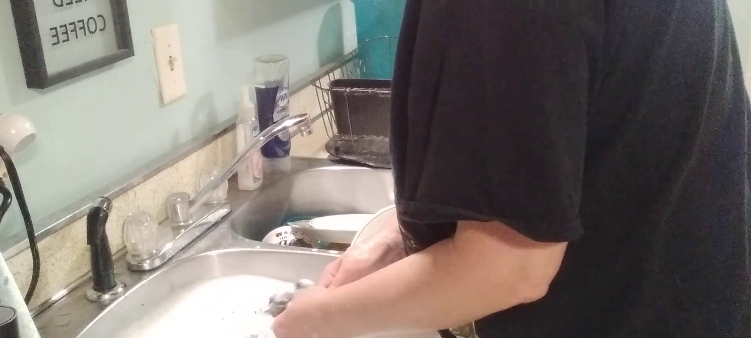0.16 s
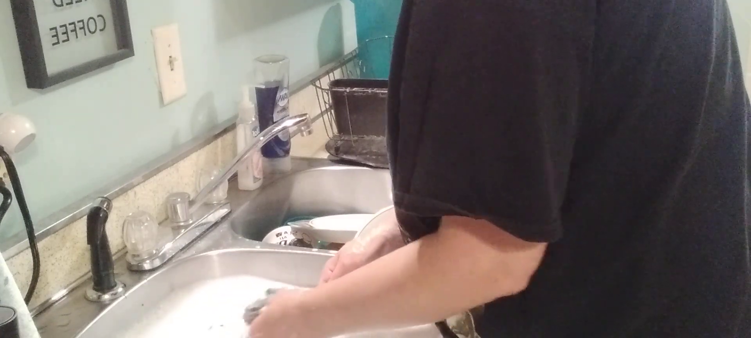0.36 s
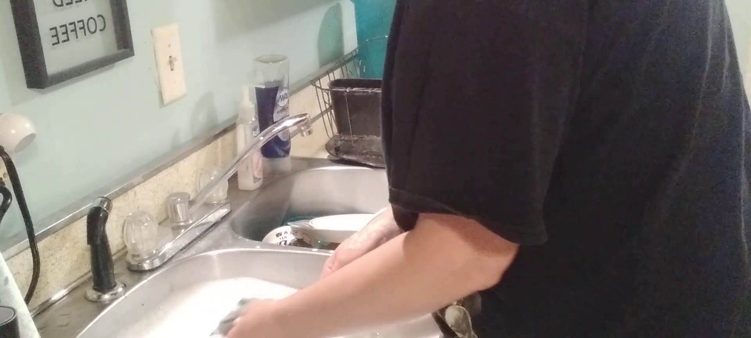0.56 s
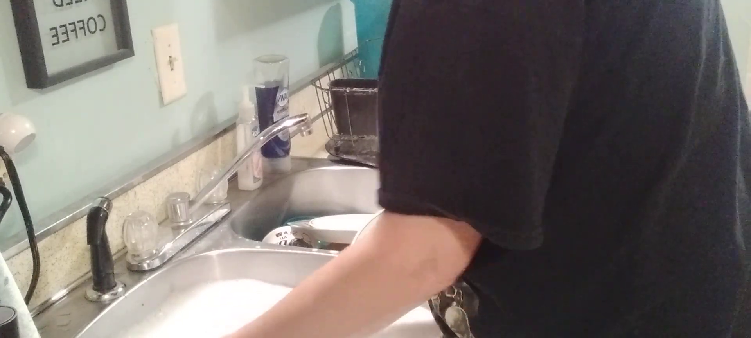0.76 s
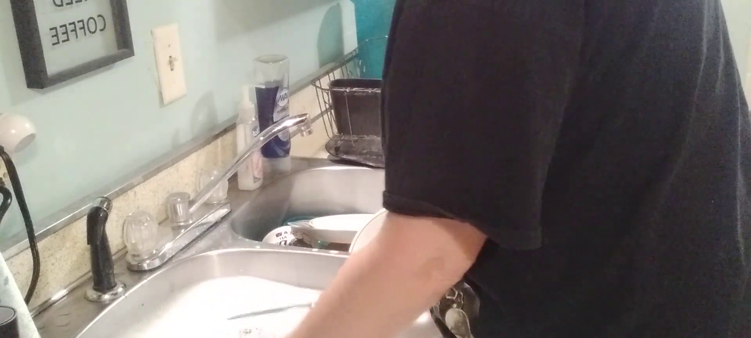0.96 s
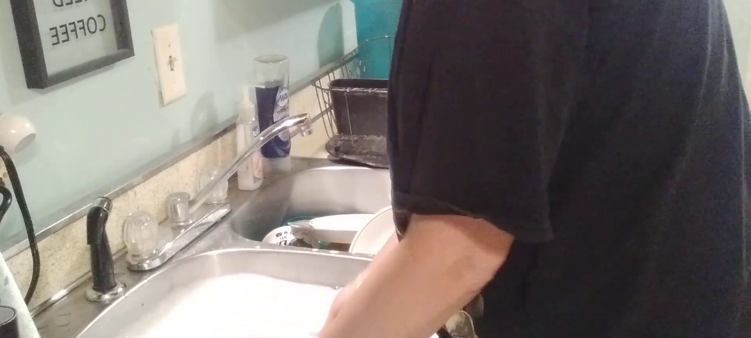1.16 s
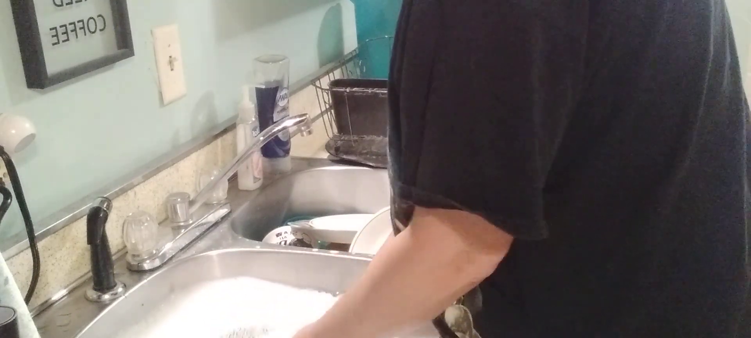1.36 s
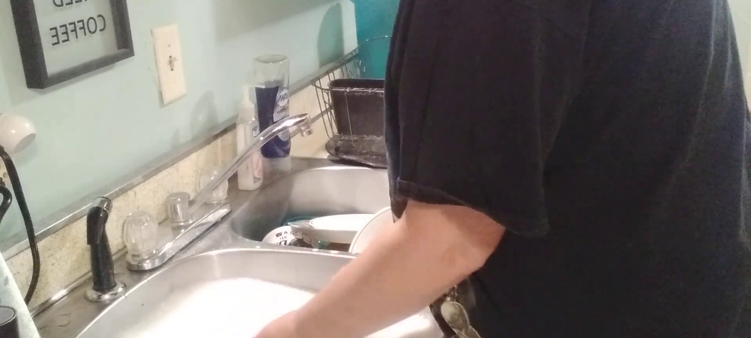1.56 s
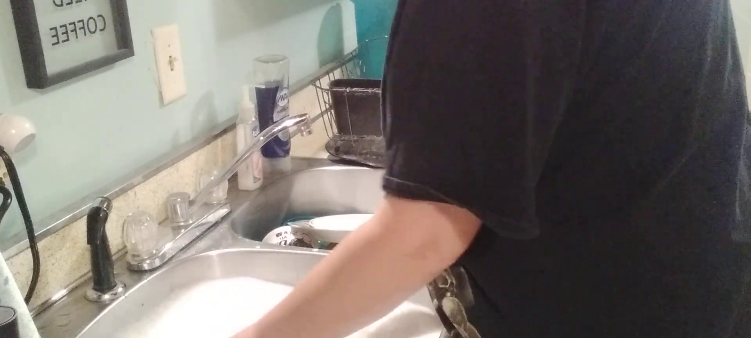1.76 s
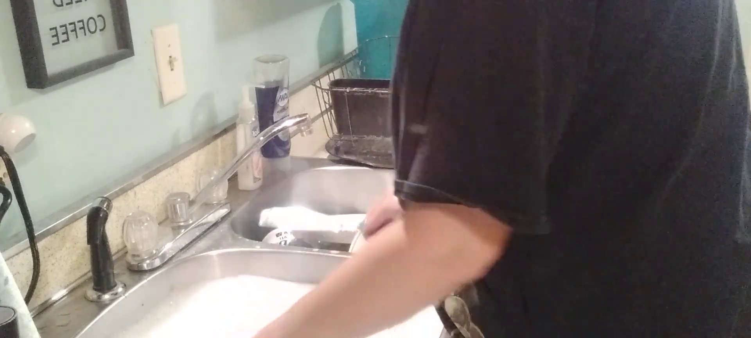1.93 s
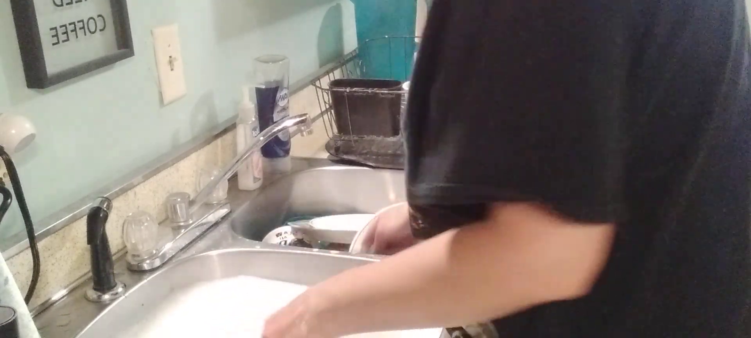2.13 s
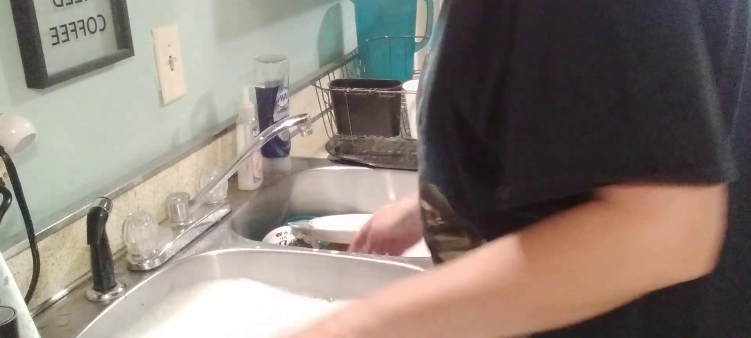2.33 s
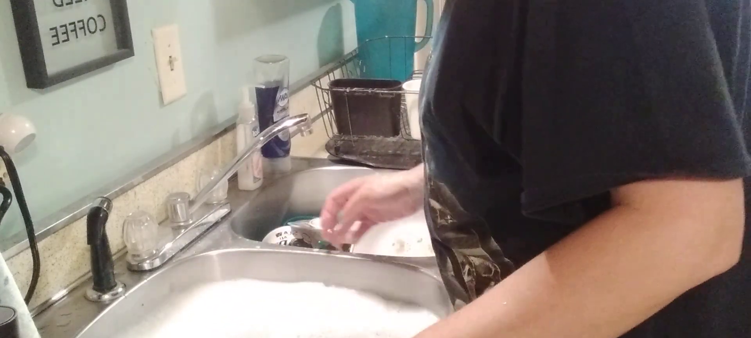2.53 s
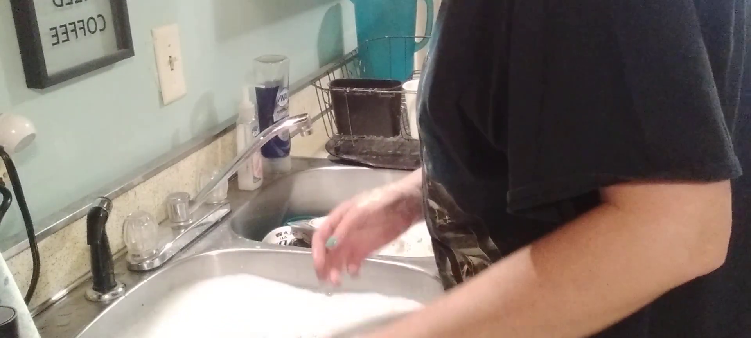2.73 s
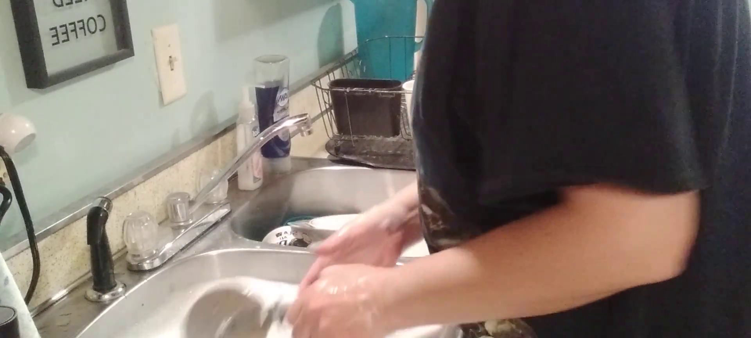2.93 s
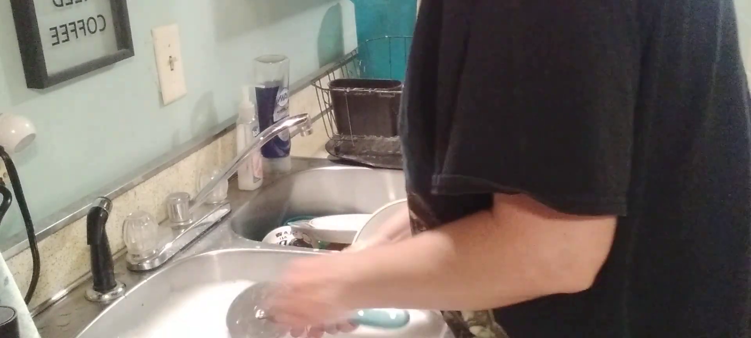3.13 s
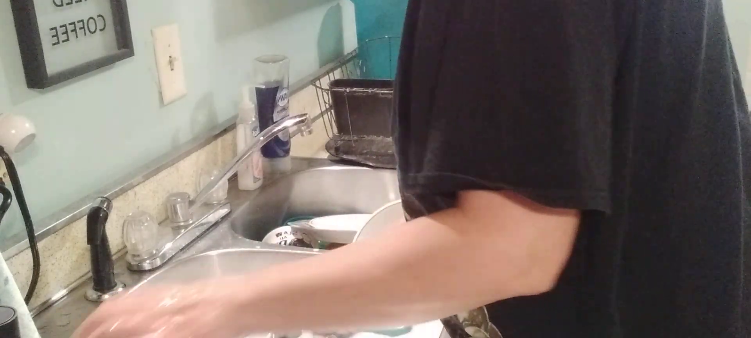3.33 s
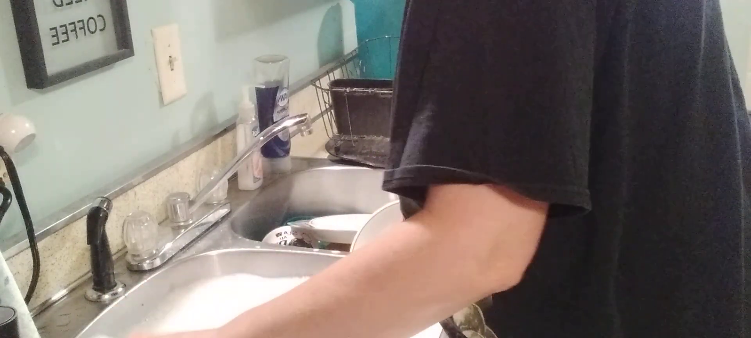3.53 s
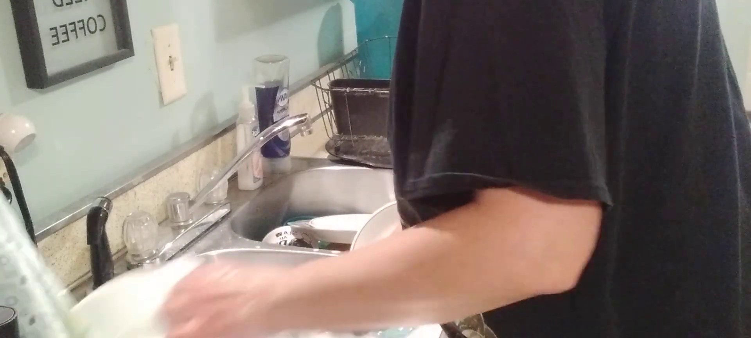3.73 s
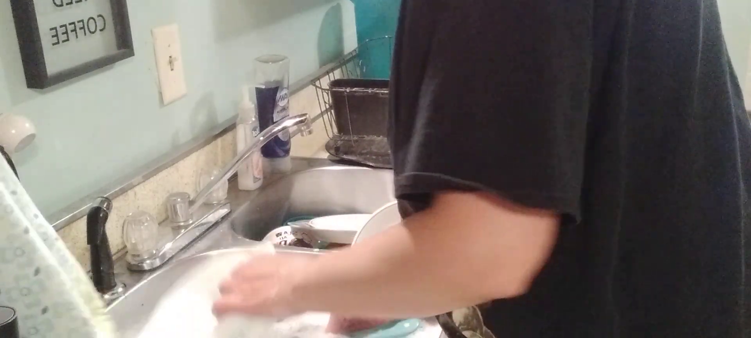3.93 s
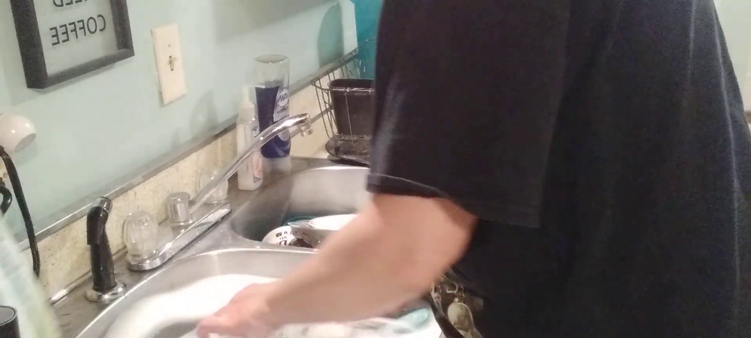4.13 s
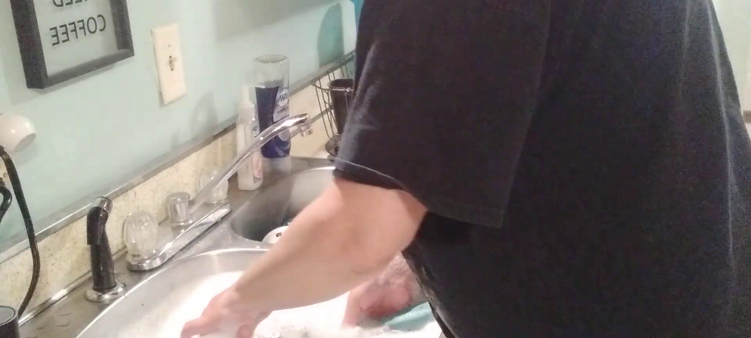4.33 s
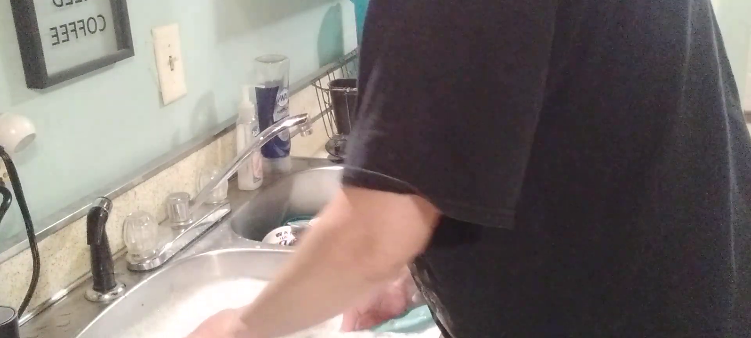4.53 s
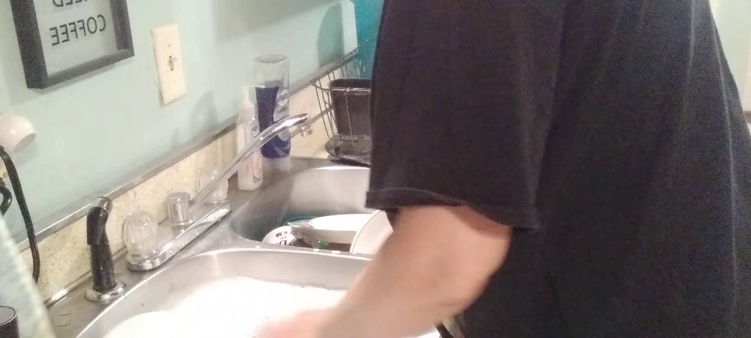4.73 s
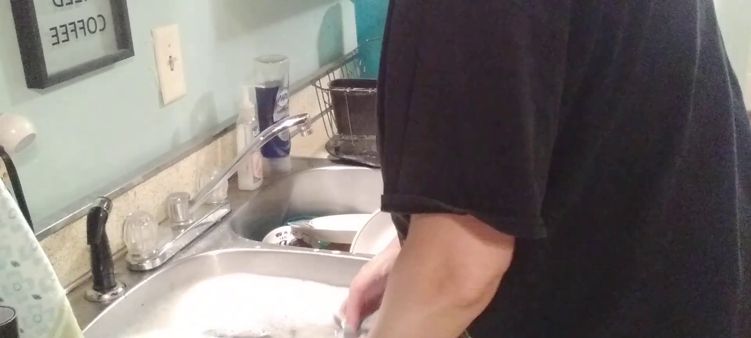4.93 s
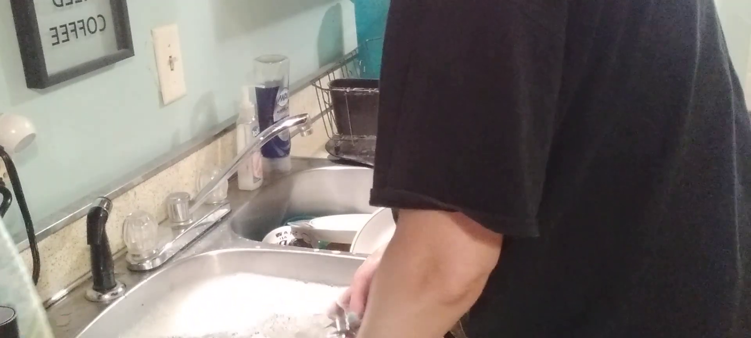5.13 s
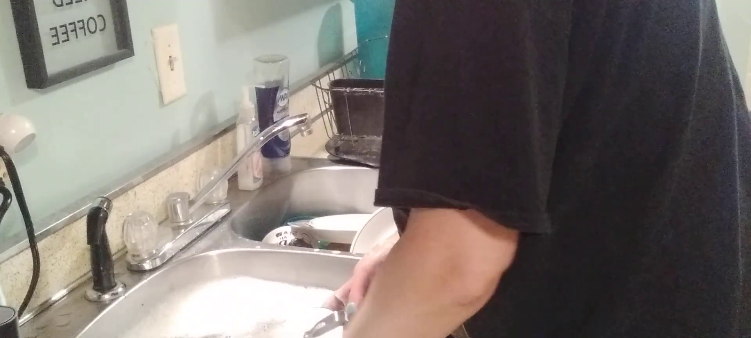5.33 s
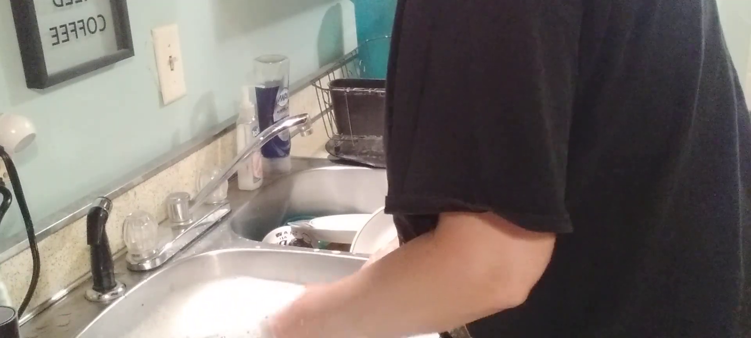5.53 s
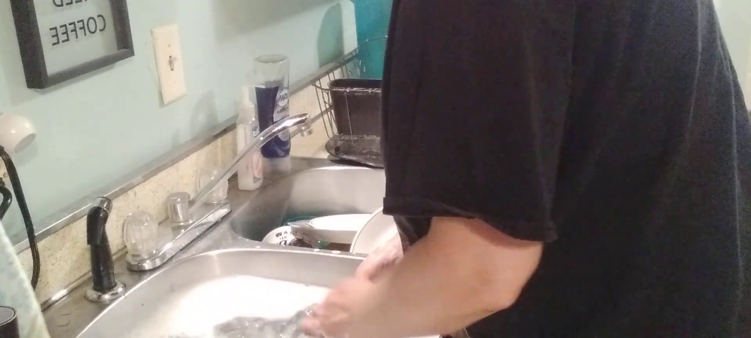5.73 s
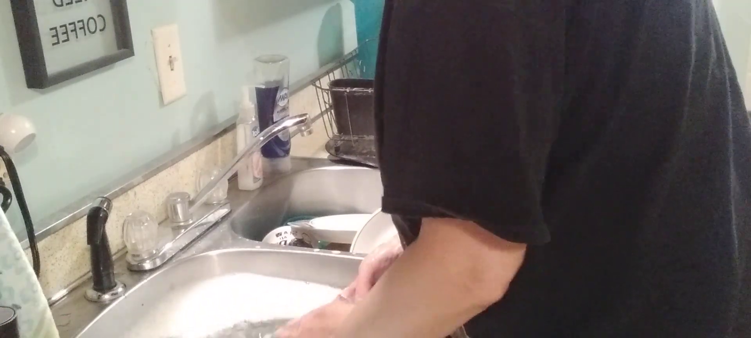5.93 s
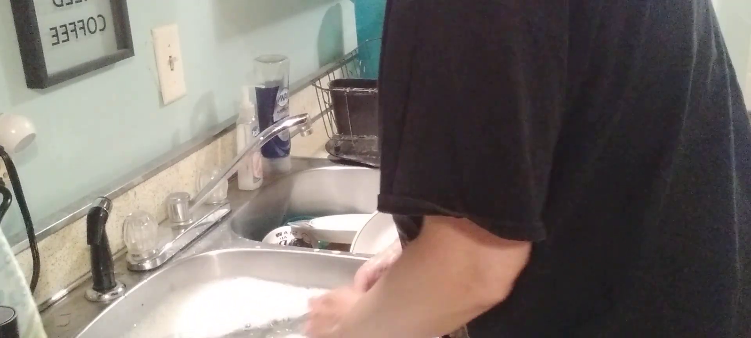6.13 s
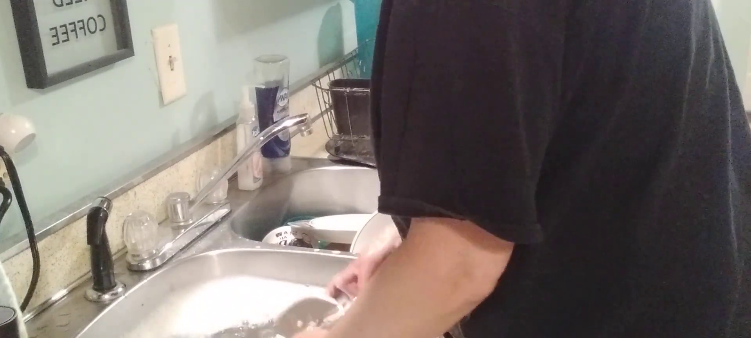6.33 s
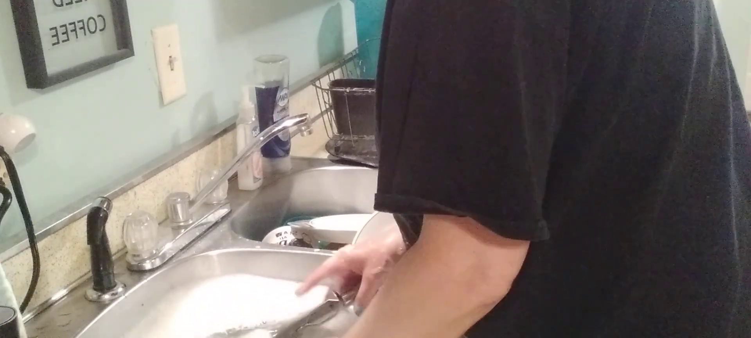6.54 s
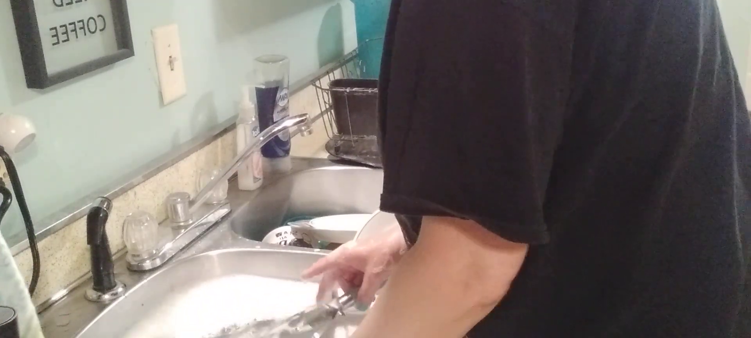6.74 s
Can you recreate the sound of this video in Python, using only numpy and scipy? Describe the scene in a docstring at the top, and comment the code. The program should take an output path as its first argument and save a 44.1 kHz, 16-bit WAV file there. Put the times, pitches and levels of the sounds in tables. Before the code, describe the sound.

Soft dishwater sounds, a bright clattering dump of forks, knives and spoons into a steel sink, then plops, muffled bumps and one sharp dish clink.

```python
"""Two handfuls of cutlery crash into the empty half of a double steel sink in a small kitchen.
The pieces, basin floor and fork tines ring as decaying modes and noise. In the filled half, dishes knock,
clink and tick as damped blows, and a dipped bowl sags in pitch. Drips, squishing suds and gurgles are
ringing bubbles over soft hiss. Hard walls echo it all, over a faint mains hum and still room air."""
import sys
import numpy as np
from scipy import signal
from scipy.fft import rfft, irfft
from scipy.io import wavfile
from scipy.ndimage import uniform_filter1d, minimum_filter1d

SR = 44100
rng = np.random.default_rng(int(sys.argv[2]) if len(sys.argv) > 2 else 0)


def pcm_store(signal):
    """Save signal as 16-bit PCM."""
    levels = np.round(np.clip(np.atleast_2d(signal), -1, 1) * 32767)
    wavfile.write(sys.argv[1], SR, levels.astype(np.int16).T)


N = 299423
TIME = np.arange(N) / SR   # s
AGE = np.arange(SR) / SR   # s since a blow

# Ringing modes of the pieces of cutlery, which the landings name. Each row: pitch in Hz, level in dB.
SPOON = [(1782, -33.5), (2159, -27), (3560, -32), (4221, -27), (4960, -33.5), (5356, -30.5), (7031, -33.5),
         (7440, -27.5)]
KNIFE = [(1803, -37), (1949, -33.5), (2045, -35), (2159, -35.5), (3973, -42.5), (5150, -37.5),
         (5340, -36.5), (7440, -38.5), (9819, -36), (10713, -44.5), (11181, -43.5)]
FORK = [(2466, -43.5), (2649, -47), (3693, -41.5), (4231, -42), (6230, -40.5), (7450, -42.5), (7957, -41.5),
        (8690, -43.5), (11208, -48.5)]
TEASPOON = [(1798, -11.5), (4860, -0.5), (5507, -4), (6137, -2), (6395, -7), (7477, -4.5)]


def from_db(db):
    """Amplitude ratio of a level in dB."""
    return 10 ** (np.asarray(db) / 20)


def rms_one(x):
    """Scale a sound to rms 1."""
    return x / np.sqrt(np.mean(x ** 2) + 1e-20)


def attack_one(x):
    """Scale a blow so that its first 25 ms have rms 1."""
    return x / np.sqrt(np.mean(x[:SR // 40] ** 2) + 1e-20)


def fade(t60, age=AGE):
    """Exponential decay by 60 dB in t60 seconds."""
    return from_db(-60 * age / max(t60, 1e-3))


def onset(onset_s):
    """Exponential rise of a blow, with its time constant in seconds."""
    return 1 - np.exp(-AGE / onset_s)


def add(track, s, sound):
    """Lay a sound into a track at s seconds."""
    start = round(s * SR)
    track[start:start + len(sound)] += sound[:len(track) - start]


def at_hz(points, hz):
    """Read a curve over log frequency."""
    curve_hz, values = np.array(points).T
    return np.interp(np.log(hz + 1e-9), np.log(curve_hz), values)


def cut(x, hz, kind, order=2):
    """Butterworth filter."""
    sos = signal.butter(order, np.clip(hz, 10, .45 * SR), kind, fs=SR, output="sos")
    return signal.sosfilt(sos, x + 1e-18)


def convolve(x, response):
    """Pass a sound through an impulse response, keeping its length."""
    return signal.fftconvolve(x, response)[:len(x)]


def body(colour, peaks=()):
    """Causal (minimum-phase) impulse response of a broad colour with resonances on top."""
    size = 8192
    hz = np.arange(size // 2 + 1) * SR / size
    db = at_hz(colour, hz)
    for centre, width, peak_db in peaks:
        db = db + peak_db / (1 + (2 * (hz - centre) / width) ** 2)
    cepstrum = irfft(np.log(from_db(db)))
    cepstrum[1:size // 2] *= 2   # fold it onto positive time
    return irfft(np.exp(rfft(cepstrum[:size // 2], size)))


def sheet(t60, crack_db):
    """Countless overlapping modes of a steel sheet: a sharp crack, then a noisy ring."""
    return rng.standard_normal(len(AGE)) * (fade(t60) + from_db(crack_db) * fade(0.015))


def bounces(chatter_s, per_s, size):
    """A first contact and a dying train of uneven rebounds."""
    hits = rng.random(len(AGE)) < per_s / SR
    train = hits * rng.normal(0, size, len(AGE)) * np.exp(-AGE / max(chatter_s, 1e-3))
    train[0] = 1
    return train


def ring(hz, t60):
    """One decaying mode, pushed either way at random."""
    return np.sin(2 * np.pi * hz * AGE) * fade(t60) * rng.choice([-1, 1])


def struck(contacts, modes, spread_db):
    """Every rebound meets another spot, so each mode (Hz, dB, t60 s) gets strengths of its own."""
    out, at = np.zeros(len(AGE)), np.flatnonzero(contacts)
    for hz, db, t60 in modes:
        drive = np.full(len(AGE), 1e-18)
        strengths = from_db(db + spread_db * rng.standard_normal(len(AGE) // 20)[:len(at)])
        drive[at] = contacts[at] * strengths * rng.choice([-1, 1])
        r, w = fade(t60, 1 / SR), 2 * np.pi * hz / SR   # two-pole resonator
        out += signal.lfilter([0, np.sin(w)], [1, -2 * r * np.cos(w), r * r], drive)
    return attack_one(out)


def bubble(hz, t60, rise, swell_cycles=1.04):
    """A ringing bubble rises in pitch as it nears the surface."""
    age = AGE[:int(np.clip(2 * t60, .002, .5) * SR)]
    phase = 2 * np.pi * np.cumsum(hz * (1 + rise * age / t60)) / SR
    return np.sin(phase) * fade(t60, age) * (1 - np.exp(-age * hz / swell_cycles))


def swarm(level_db, low_hz, high_hz, length_s, bubbles_per_s, cycles, hiss_db, swell):
    """One push of the water frees a swarm of tiny ringing bubbles over a soft hiss."""
    fizz, span = np.zeros(SR), np.clip(2 * length_s, .02, .4)
    for when, pitch in rng.random((int(bubbles_per_s * span) + 1, 2)):
        hz = low_hz * (high_hz / low_hz) ** pitch
        add(fizz, when * span, bubble(hz, cycles / hz, rise=.03))
    fizz = rms_one(fizz[:int(span * SR)])
    hiss = cut(rng.standard_normal(len(fizz)), low_hz, "high", order=8)
    hiss = rms_one(cut(hiss, high_hz, "low", order=8))
    progress = AGE[:len(fizz)] / max(length_s, 1e-3)
    squeeze = (1 - np.exp(-progress / swell)) * np.exp(-progress ** 2)
    return from_db(level_db) * (fizz + from_db(hiss_db) * hiss) * squeeze


def cutlery(ring_t60=0.19, basin_t60=0.21, modes_db=-8.0, basin_db=-3, crack_db=1, spread_db=2,
            jostle_db=-8, jostle_t60=.1, jostle_db_per_octave=-2, note_t60=0.1, onset_s=0.0011):
    """Each landing rings the piece, its neighbours in the handful and the basin floor."""
    # Cutlery landing in the empty basin. Each row: start in seconds, level in dB, chatter in seconds,
    # note of the spot of floor it hits in Hz, level of that note in dB against the blow, modes of the piece.
    landings = [(2.252, -33, .027, 720, -11.5, TEASPOON), (2.263, -9, .0052, 242, -13.5, SPOON),
                (2.324, -16.5, .0059, 742, -1.5, SPOON), (2.353, -18.5, .0073, 1254, -7, SPOON),
                (2.379, -7, .009, 1132, -9, KNIFE), (2.400, -11.5, .025, 642, -11, KNIFE),
                (2.445, -18, 0.018, 563, -9.5, KNIFE), (2.497, -15.5, 0.0028, 2635, -10.5, TEASPOON),
                (2.510, -17, .014, 1349, -5.5, TEASPOON), (2.606, -24, 0.017, 1100, -9.5, TEASPOON),
                (2.663, -34.5, 0.07, 680, -4.5, TEASPOON), (2.748, -20, .0041, 1148, -9, SPOON),
                (2.774, -22, 0.033, 682, -5.5, FORK), (2.825, -14.5, 0.026, 256, -9, FORK),
                (2.851, -16, .04, 665, -9, FORK), (2.913, -18.5, .0051, 693, -3.5, FORK),
                (2.997, -24.5, 0.0026, 722, -21, FORK)]
    # Broad colour of the empty basin. Each row: frequency in Hz, level in dB.
    steel_colour = [(30, -27.5), (120, -22.5), (190, -8), (900, -6), (2200, 1.5), (3200, -1), (5400, 2.5),
                    (7800, -5), (11000, -12.5), (16000, -19)]
    # Its strongest resonances. Each row: centre in Hz, width in Hz, height in dB.
    steel_peaks = [(240, 41, 5.5), (680, 310, 7.8), (1164.6, 130, 5.3), (1374, 45, 3.9), (2004, 130, 4.6)]
    firm_db = -14.5   # level of a firm landing; harder ones are brighter, softer ones boomier
    jostle_low_hz, jostle_high_hz = 1798, 12580   # range of the neighbours' modes
    out, steel = np.zeros(N), body(steel_colour, steel_peaks)
    for s, level_db, chatter_s, note_hz, note_db, modes in landings:
        force_db = level_db - firm_db
        boom_db = 6 - 0.12 * force_db - 2.5 * (modes == FORK)   # the light fork shakes the basin less
        treble_db = -6 + 0.47 * force_db + 5.5 * (modes == KNIFE)   # the thin blade is brighter
        contacts = bounces(chatter_s, per_s=380, size=.8)
        # high modes die sooner
        piece = [(hz, db, ring_t60 * (4000 / hz) ** 0.32) for hz, db in modes]
        blow = from_db(modes_db) * struck(contacts, piece, spread_db)
        neighbours = [(hz, jostle_db_per_octave * np.log2(hz / jostle_low_hz), jostle_t60)
                      for hz in rng.uniform(jostle_low_hz, jostle_high_hz, size=12)]
        blow += from_db(jostle_db) * struck(contacts, neighbours, spread_db)
        basin = convolve(contacts, convolve(sheet(basin_t60, crack_db), steel))
        blow += from_db(basin_db) * attack_one(basin)
        blow += (from_db(boom_db) - 1) * cut(blow, 1000, "low", order=1)
        blow += (from_db(treble_db) - 1) * cut(blow, 11000, "high", order=1)
        blow += from_db(note_db) * attack_one(ring(note_hz, note_t60))
        add(out, s, from_db(level_db) * blow * onset(onset_s))
    return out


def tines(struck_s=2.86, beat_hz=11, partner=0.29):
    """Neighbouring fork tines are slightly out of tune, so their ring wavers as it dies."""
    # Tines singing on in the second crash. Each row: pitch in Hz, level in dB, t60 in seconds.
    tine_modes = [(2730, -33, .68), (4377, -28.5, .5), (7700, -35, .62), (9830, -33, .48)]
    out = np.zeros(N)
    for hz, db, t60 in tine_modes:
        neighbour = ring(hz + beat_hz * (.5 + rng.random()), t60)
        add(out, struck_s, from_db(db) * (ring(hz, t60) + partner * neighbour))
    return out


def knocks(basin_t60=0.11, crack_db=2, thump_db=-3, thump_t60=0.081, cushion=4):
    """Dishes bump the filled basin; the deeper under water, the duller the knock and the softer its onset."""
    # Each row: start in seconds, level in dB, dull above this Hz, pitch of the dish's thump in Hz.
    bumps = [(3.582, -40, 900, 518), (3.603, -32, 1314, 215), (3.630, -31, 594, 198.5),
             (3.665, -31.5, 855, 487), (3.690, -37.5, 867, 609.5), (4.741, -33.5, 2686, 346),
             (4.874, -35.5, 1300, 352), (4.921, -36, 1500, 366), (4.961, -42.5, 1200, 363),
             (5.167, -36.5, 783, 696), (5.238, -40.5, 600, 591.6), (5.780, -39, 3500, 1126),
             (5.821, -43, 4060, 555), (5.978, -38.5, 3260, 379), (5.993, -37.5, 1870, 302),
             (6.491, -26, 4020, 975), (6.497, -30, 2184, 537), (6.599, -42.5, 1090, 740),
             (6.717, -47, 1800, 364)]
    # Broad colour of the filled basin. Each row: frequency in Hz, level in dB.
    filled_colour = [(40, -15), (200, 0), (700, 2.5), (1100, -3), (1600, -5.5), (2300, -2), (3500, -6),
                     (8000, -1), (15000, -9)]
    # Its resonances. Each row: centre in Hz, width in Hz, height in dB.
    filled_peaks = [(393, 20, 6), (606, 24, 3.8), (717, 21, 4.1), (1075, 210, 6.7), (2020, 1000, 2.1)]
    out, filled = np.zeros(N), body(filled_colour, filled_peaks)
    for s, level_db, dull_hz, thump_hz in bumps:
        chatter_s = 0.012 * (980 / dull_hz) ** 0.62   # duller knocks chatter for longer
        contacts = bounces(chatter_s, per_s=360, size=.6)
        blow = convolve(contacts, convolve(sheet(basin_t60, crack_db), filled))
        blow = cut(blow, dull_hz, "low", order=2)
        blow = attack_one(cut(blow, 0.61 * thump_hz, "high", order=3))
        blow += from_db(thump_db) * attack_one(ring(thump_hz, thump_t60))
        blow = cut(blow * onset(cushion / dull_hz), [0.5 * thump_hz, 4.6 * dull_hz], "band")
        add(out, s, from_db(level_db) * attack_one(blow))
    return out


def clink(crack_t60=0.025, low_hz=480, high_hz=6000, onset_s=0.00057):
    """A wet dish held in the hand above the water rings only briefly."""
    # Each row: start in seconds, level in dB, crack of the contact in dB against the modes' scale.
    contacts = [(5.7427, -13.5, -9.5), (5.779, -28, 10)]
    # Modes of the dish. Each row: pitch in Hz, level in dB, t60 in seconds.
    dish_modes = [(1070, -5.5, 0.026), (1755, -0.5, 0.021), (2050, -7, 0.024), (4450, -7.5, 0.018)]
    out = np.zeros(N)
    for s, level_db, crack_db in contacts:
        crack = cut(rng.standard_normal(len(AGE)) * fade(crack_t60), high_hz, "low")
        blow = sum(from_db(db) * ring(hz, t60) for hz, db, t60 in dish_modes)
        blow = (blow + from_db(crack_db) * crack) * onset(onset_s)
        add(out, s, from_db(level_db) * cut(blow, low_hz, "high", order=4))
    return out


def bowl(t60=0.2, rough=0.57, flutter_hz=70):
    """Water loads a dipped bowl: its ring sags, each mode by its own share, and flutters as water laps at it."""
    # Touches of the bowl. Each row: start in seconds, level in dB.
    touches = [(3.304, -42), (3.355, -51)]
    # Its modes. Each row: pitch in Hz, level in dB, share of the sag (exponent of the pitch ratio).
    bowl_modes = [(630, 1, 1.22), (1580, -2.5, 1.29), (2694, -5, 0.65)]
    # The dip. Each row: time in seconds, pitch ratio.
    dip = [(3.32, 1), (3.355, .905)]
    taps = np.zeros(N)
    for s, level_db in touches:
        add(taps, s, from_db(level_db) * fade(t60) * onset(0.0076))
    ratio = np.interp(TIME, *np.transpose(dip))
    out = np.zeros(N)
    for hz, db, sag in bowl_modes:
        tone = np.sin(2 * np.pi * hz * np.cumsum(ratio ** sag) / SR)
        flutter = 1 + rough * rms_one(cut(rng.standard_normal(N), flutter_hz, "low"))
        out += from_db(db) * tone * flutter
    return taps * out


def ticks(t60=0.042, onset_s=0.00068, width=1.5):
    """Wet glaze catches and slips as a dish turns in the hands: a short, damped scrape."""
    # Each row: start in seconds, level in dB, centre of the band in Hz (edges are width times off).
    scrapes = [(5.556, -59, 2910), (5.655, -54.5, 2960), (5.678, -48.5, 3330), (5.938, -54, 4000),
               (6.254, -60, 2700), (6.351, -58.5, 2300), (6.394, -59, 2680), (6.674, -58, 4600)]
    out = np.zeros(N)
    for s, level_db, hz in scrapes:
        scrape = rng.standard_normal(len(AGE)) * fade(t60) * onset(onset_s)
        scrape = cut(scrape, hz / width, "high", order=4)
        scrape = cut(scrape, hz * width, "low", order=4)
        add(out, s, from_db(level_db) * attack_one(scrape))
    return out


def drips(cycles=42, rise=0.084, spray_db=-11, spray_spread=0.248, swell_cycles=4, gain_db=3):
    """A drop traps one main bubble, which swells over a few cycles, and four fainter ones just after it."""
    # The clearest drips and plops. Each row: start in seconds, level in dB ahead of gain_db, pitch in Hz.
    drops = [(0.513, -39, 1234), (0.707, -52, 3000), (0.976, -39, 1014), (1.227, -38.5, 1780),
             (1.268, -35, 1205), (1.557, -46, 2900), (1.729, -40, 1120), (1.865, -49, 1200),
             (3.098, -24, 2370), (3.406, -38, 2673), (3.493, -44, 3720), (3.541, -36, 700),
             (3.790, -47, 1934), (4.320, -54, 4395), (4.583, -44.5, 3380), (4.607, -22.5, 573),
             (5.602, -42, 1225), (5.650, -30.5, 1250), (5.701, -32, 1410), (6.164, -43.5, 2106),
             (6.372, -44, 1197), (6.743, -27.5, 604)]
    out = np.zeros(N)
    for s, level_db, hz in drops:
        t60 = cycles / np.sqrt(hz * 1500)   # big bubbles ring longer
        add(out, s, from_db(level_db) * bubble(hz, t60, rise, swell_cycles))
        for delay, detune in zip(rng.uniform(0, 0.0071, size=4), rng.normal(0, spray_spread, size=4)):
            spray = bubble(hz * np.exp(detune), t60 / 2, rise, swell_cycles)
            add(out, s + delay, from_db(level_db + spray_db) * spray)
    return from_db(gain_db) * out


def suds():
    """Scrubbing squeezes fine foam, and hands splashing free bubbles of many sizes."""
    # Scrubbing strokes, all through the same foam. Each row: start in seconds, level in dB.
    strokes = [(0.336, -58), (.769, -62.5), (1.111, -61.5), (1.716, -63.5), (1.959, -66), (3.98, -66.5)]
    # Splashes. Each row: start in seconds, level in dB, pitch of the biggest bubbles in Hz,
    # pitch of the smallest in Hz, length in seconds.
    splashes = [(.094, -51.5, 1960, 8940, 0.043), (0.912, -65.5, 448, 2540, 0.12),
                (0.995, -49.5, 1003, 4160, 0.078), (1.333, -56.5, 3210, 4950, 0.041),
                (1.773, -61, 600, 3900, 0.06), (1.874, -59, 3040, 9100, 0.038),
                (3.577, -51, 3090, 9170, .11), (4.063, -43, 1597, 7510, 0.035),
                (5.598, -56.5, 2500, 9030, 0.1)]
    out = np.zeros(N)
    for s, level_db in strokes:
        add(out, s, swarm(level_db, low_hz=4440, high_hz=7750, length_s=0.083,
                          bubbles_per_s=900, cycles=190, hiss_db=-8.5, swell=0.28))
    for s, level_db, low_hz, high_hz, length_s in splashes:
        add(out, s, swarm(level_db, low_hz, high_hz, length_s,
                          bubbles_per_s=360, cycles=100, hiss_db=-4.5, swell=0.2))
    return out


def gurgle(level_db=-3.5, per_s=200, low_hz=1100, high_hz=3100, db_per_octave=2, range_db=4, cycles=85,
           wash_db=-11):
    """Stirred water bubbles over a soft wash, as strongly as the hands move; higher bubbles are louder."""
    # Hands stir and lift a dish: one curve a spell. Each row: time in seconds, level in dB ahead of level_db.
    stirring = [
        [(5.5, -68.5), (5.73, -48)],
        [(6.14, -56), (6.346, -67.5), (6.384, -52.5), (6.44, -61)],
    ]
    out = np.zeros(N)
    for spell in stirring:
        s, db = np.transpose(spell)
        water, span = np.zeros(2 * SR), s[-1] - s[0]
        for when, pitch, size in rng.random((int(per_s * span), 3)):
            hz = low_hz * (high_hz / low_hz) ** pitch
            strength = from_db(db_per_octave * np.log2(hz / low_hz) + range_db * size)
            add(water, when * span, strength * bubble(hz, cycles / hz, rise=.05, swell_cycles=4))
        water = rms_one(water[:int(span * SR)])
        wash = cut(rng.standard_normal(len(water)), [low_hz, 3000], "band")
        water += from_db(wash_db) * rms_one(wash)
        stir_db = np.interp(s[0] + AGE[:len(water)], s, db)
        add(out, s[0], water * from_db(level_db + stir_db))
    return out


def lapping(per_s=14, faintest_db=-63, range_db=6, low_hz=600, high_hz=7500, t60=0.025):
    """The stirred water keeps murmuring with faint stray bubbles."""
    out = np.zeros(N)
    for when, pitch, size in rng.random((int(per_s * N / SR), 3)):
        blip = bubble(low_hz * (high_hz / low_hz) ** pitch, t60, rise=0.081, swell_cycles=18)
        add(out, when * TIME[-1], from_db(faintest_db + range_db * size) * blip)
    return out


def off_the_wall(x):
    """The near basin wall throws the small sounds back a moment later, which colours them."""
    # The reflection: delay in seconds, gain in dB.
    wall_echo = (.0009, -7.5)
    delay_s, gain_db = wall_echo
    reflection = from_db(gain_db) * np.interp(TIME - delay_s, TIME, x)
    return (x + reflection) / np.hypot(1, from_db(gain_db))


def kitchen(x):
    """Diffuse echo from hard walls, dying at its own rate in each band of about an octave."""
    # Each row: frequency in Hz, t60 in seconds.
    room_t60 = [(2800, 0.31), (14000, 0.29)]
    edges = np.geomspace(80, 19000, 9)   # Hz
    tail = np.zeros(len(AGE))
    for low, high in zip(edges, edges[1:]):
        noise = cut(rng.standard_normal(len(AGE)), [low, high], "band")
        tail += noise * fade(at_hz(room_t60, np.sqrt(low * high)))
    tail *= onset(0.0049)
    return convolve(x, tail / np.sqrt(np.sum(tail ** 2)))


def background(air_db=-72.5):
    """Mains hum as steady sines, and still room air as coloured noise."""
    # Each row: frequency in Hz, rms level in dB.
    hum_tones = [(60, -75), (180, -80)]
    # Broad colour of the air. Each row: frequency in Hz, level in dB.
    air_colour = [(25, -10.5), (300, -6.5), (1000, -12), (2500, -22), (15000, -30.5)]
    hum = np.zeros(N)
    for hz, db in hum_tones:
        hum += from_db(db) * np.sqrt(2) * np.sin(2 * np.pi * (hz * TIME + rng.random()))
    air = rms_one(convolve(rng.standard_normal(N), body(air_colour)))
    return hum + from_db(air_db) * air


def scene(empty_wet_db=-6, filled_wet_db=-6):
    """Both basins, their echo in the kitchen and the background, as one channel."""
    empty_basin = cutlery() + tines()
    small_sounds = off_the_wall(ticks() + suds() + gurgle() + lapping())
    filled_basin = knocks() + clink() + drips() + bowl() + small_sounds
    echo = kitchen(from_db(empty_wet_db) * empty_basin + from_db(filled_wet_db) * filled_basin)
    return (empty_basin + filled_basin + echo + background())[None]


def record(dry, ceiling=0.8, cutoff_hz=15900):
    """A fast limiter holds down the loudest crashes; the top is cut."""
    span = SR // 1000   # 1 ms
    needed = np.minimum(1, ceiling / (np.abs(dry) + 1e-9))
    gain = uniform_filter1d(minimum_filter1d(needed, span), span)
    steep_cut = signal.ellip(10, .1, 80, cutoff_hz, fs=SR, output="sos")
    return signal.sosfilt(steep_cut, dry * gain)


dry = scene()
out = record(dry)
pcm_store(out)
```